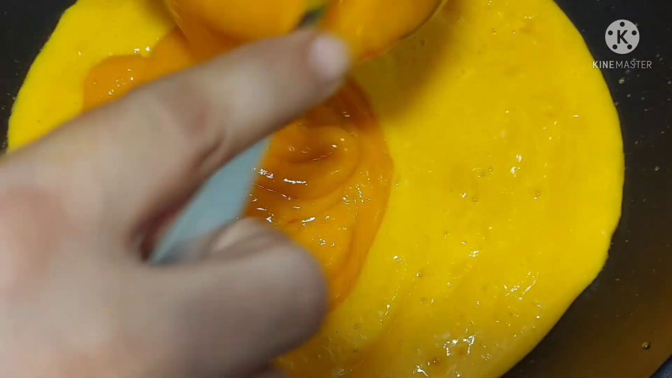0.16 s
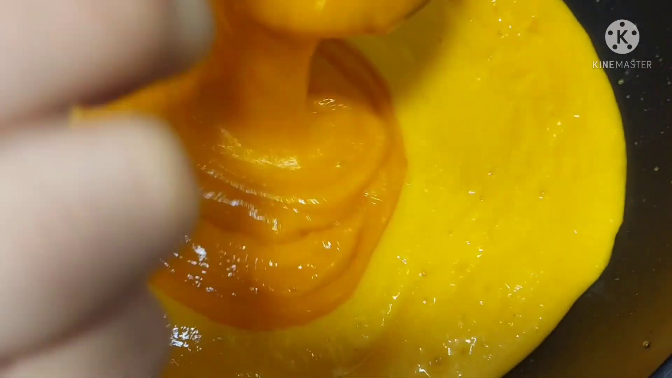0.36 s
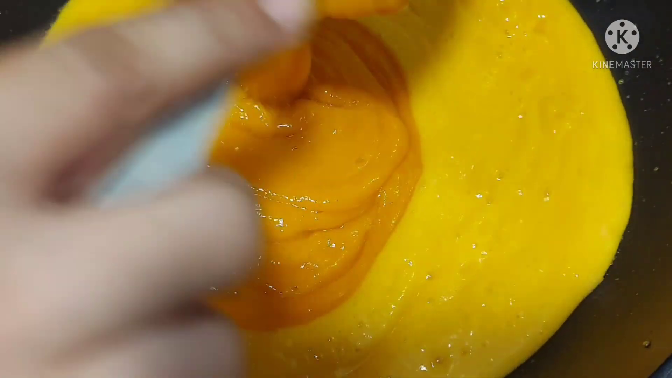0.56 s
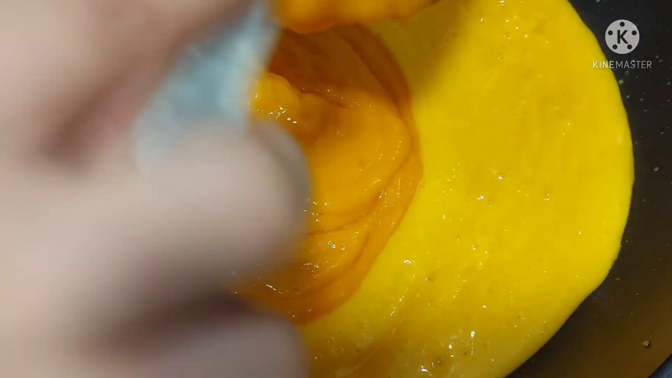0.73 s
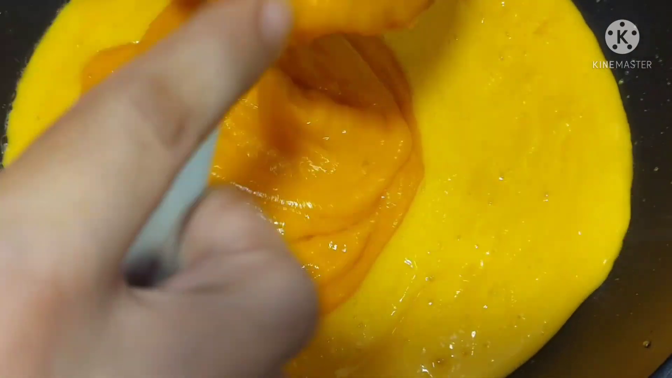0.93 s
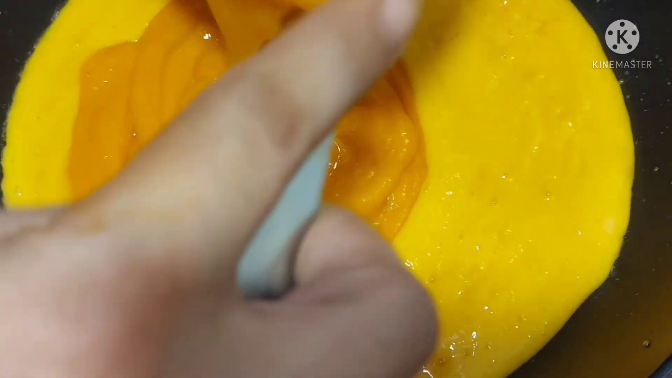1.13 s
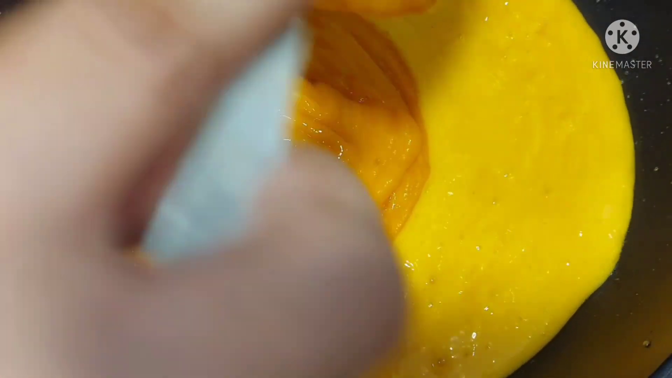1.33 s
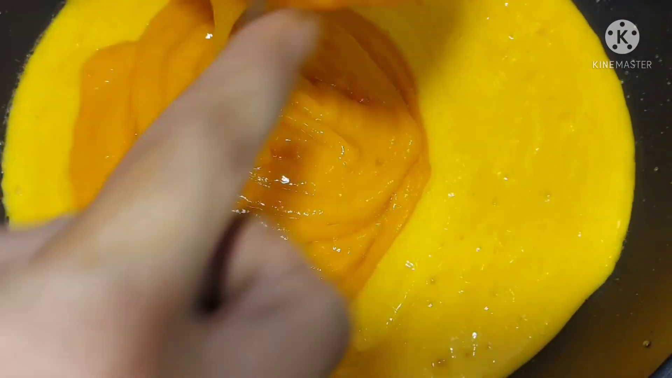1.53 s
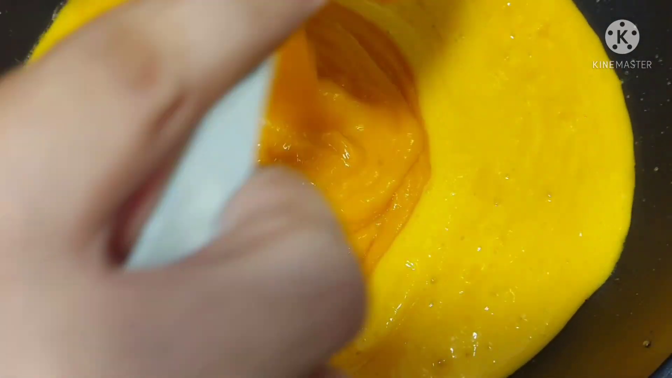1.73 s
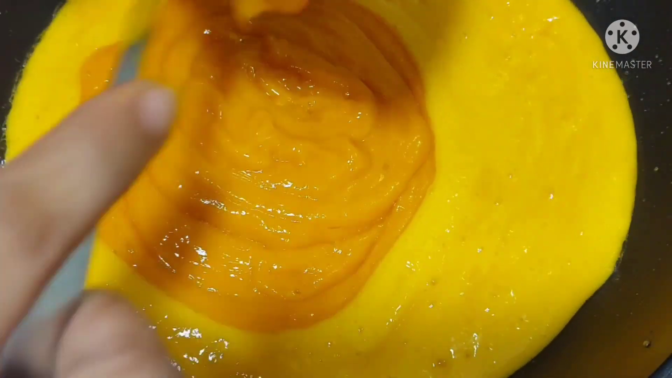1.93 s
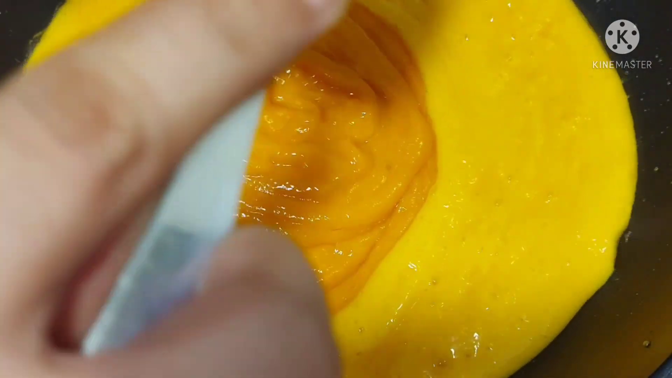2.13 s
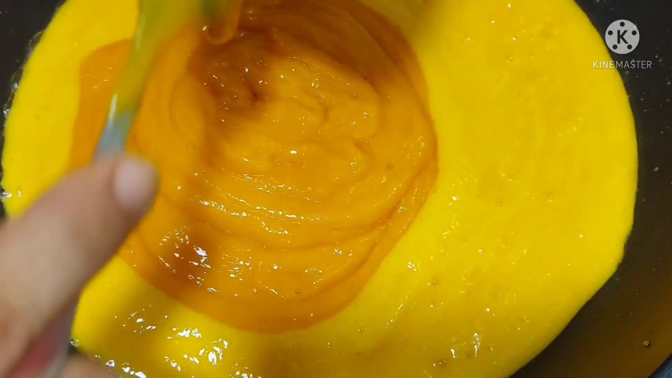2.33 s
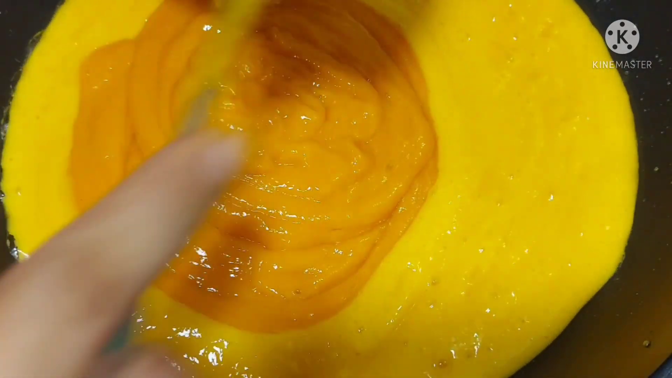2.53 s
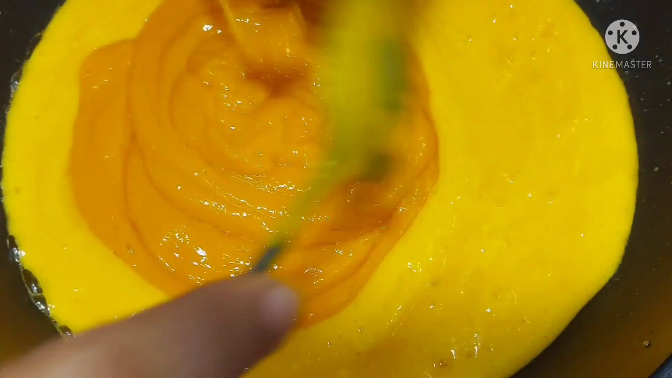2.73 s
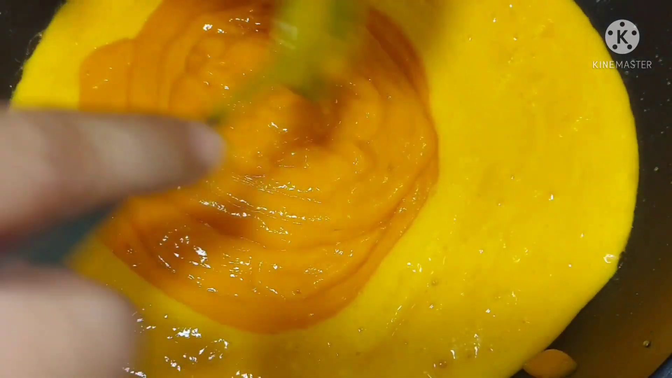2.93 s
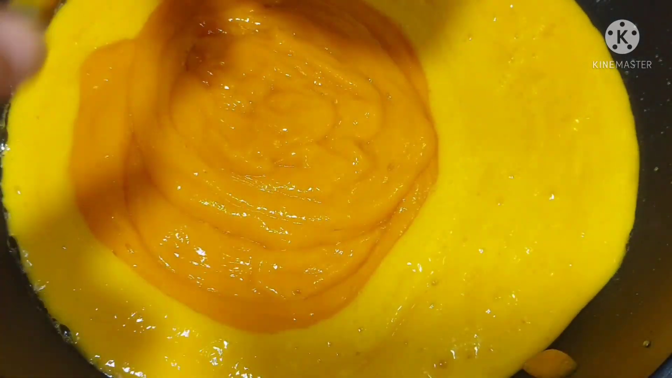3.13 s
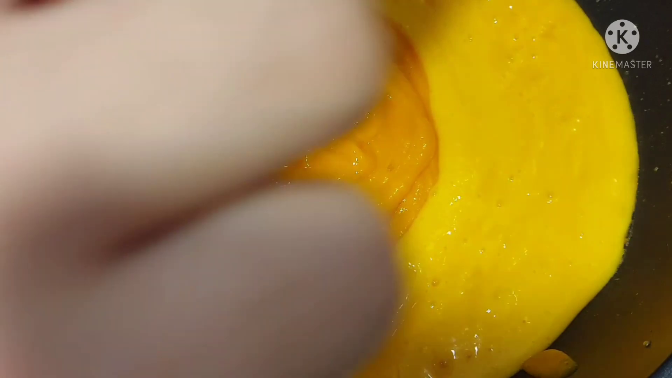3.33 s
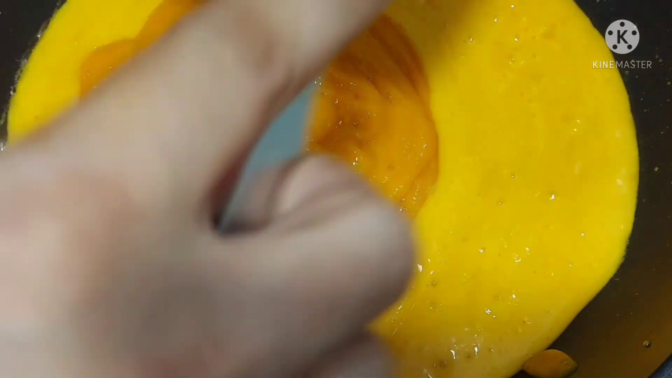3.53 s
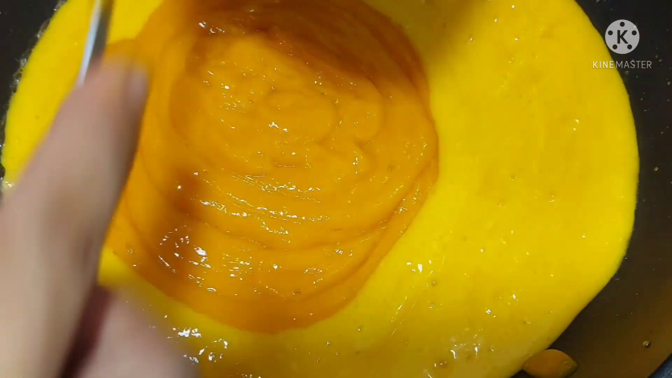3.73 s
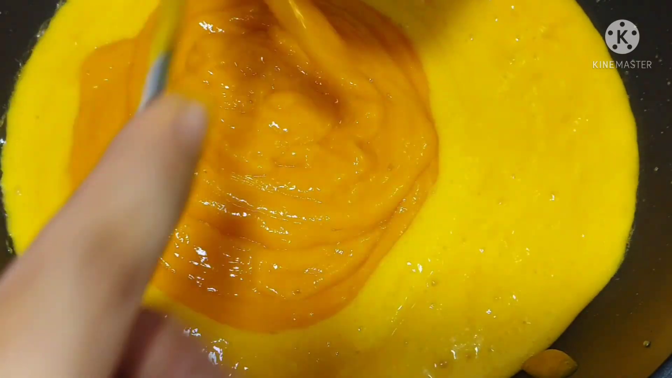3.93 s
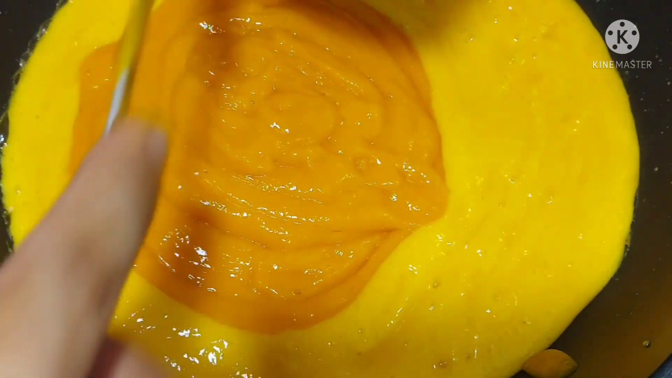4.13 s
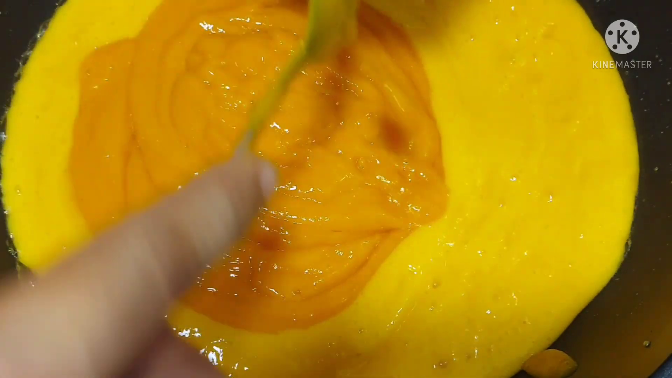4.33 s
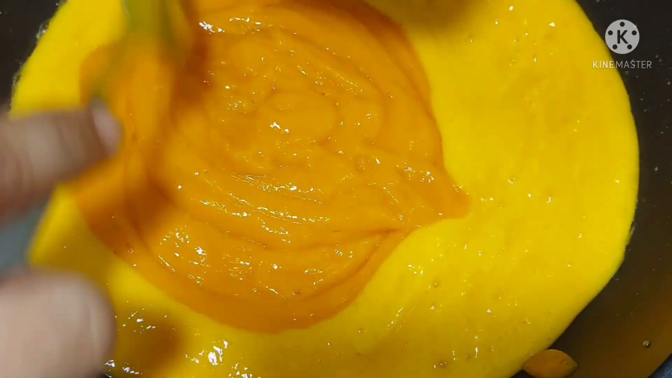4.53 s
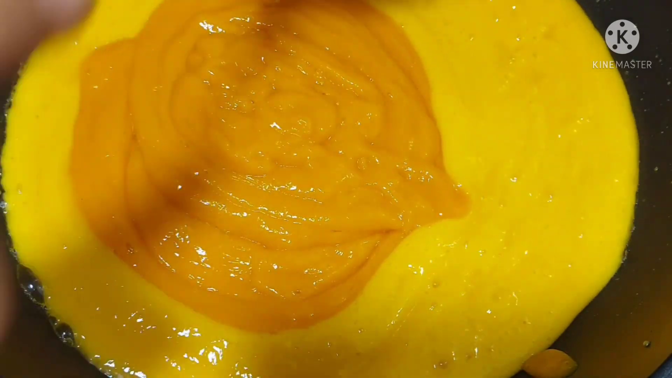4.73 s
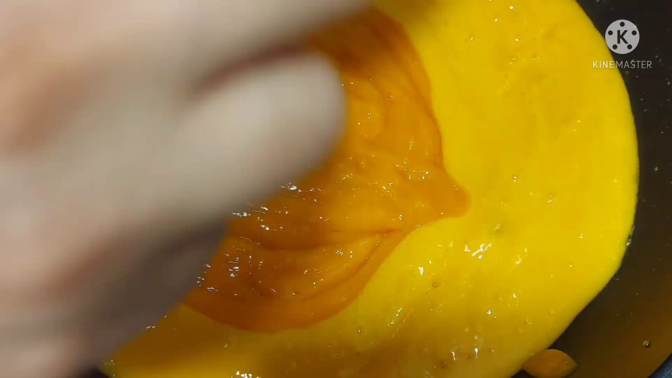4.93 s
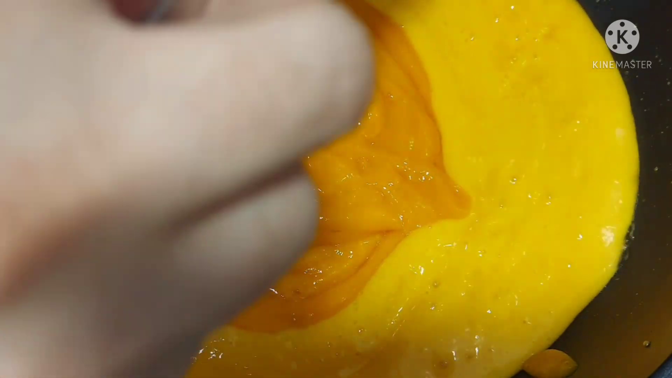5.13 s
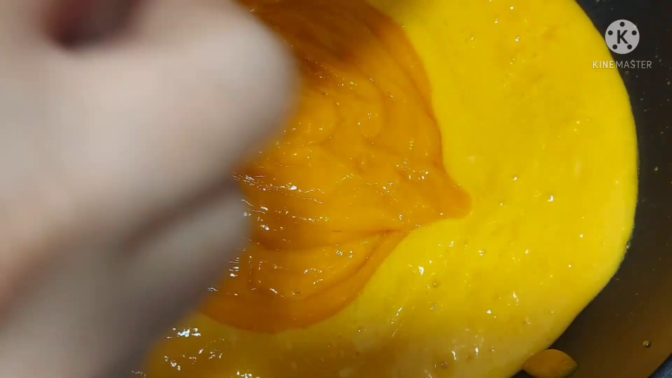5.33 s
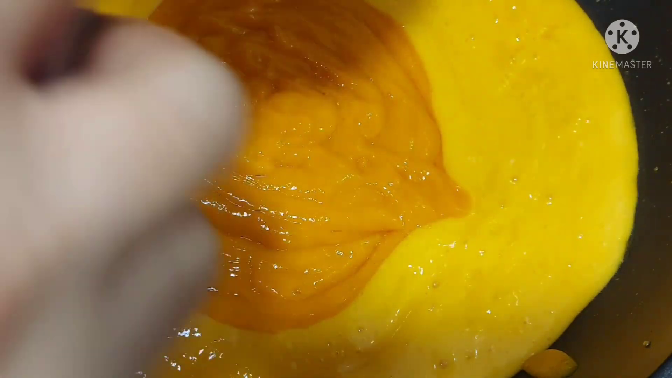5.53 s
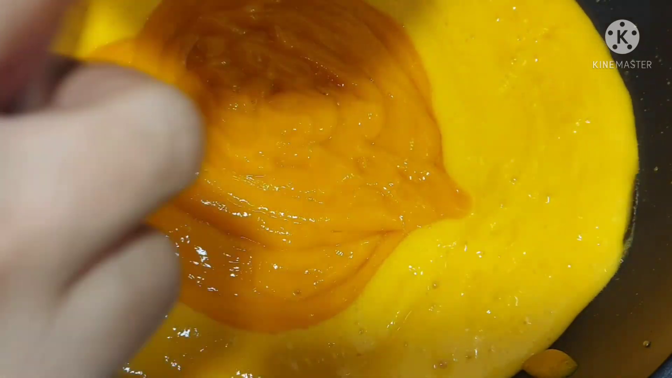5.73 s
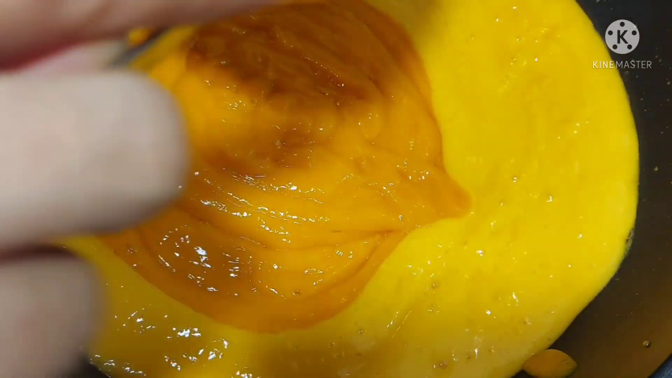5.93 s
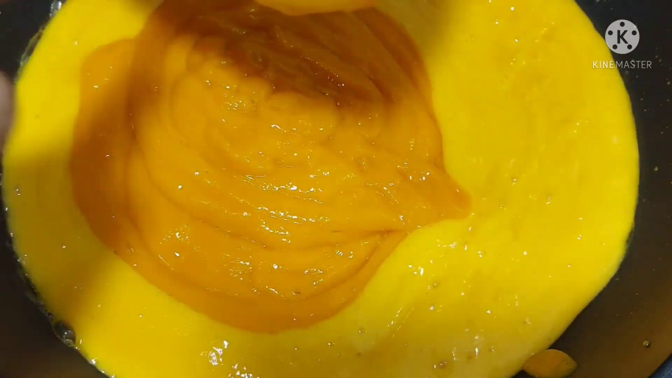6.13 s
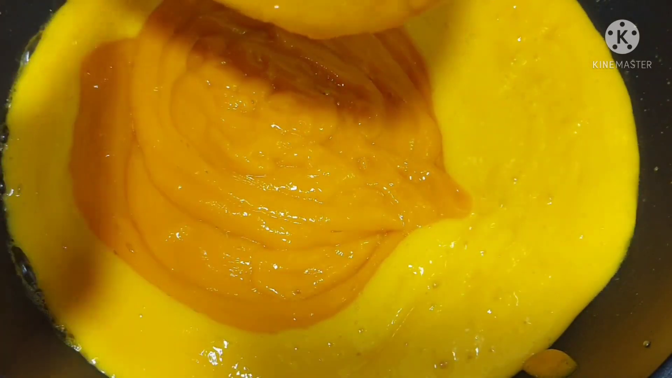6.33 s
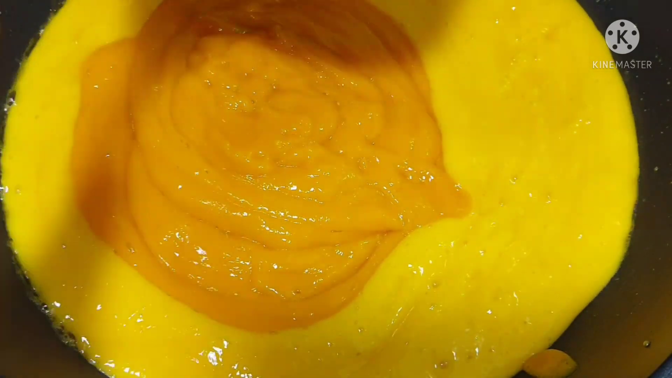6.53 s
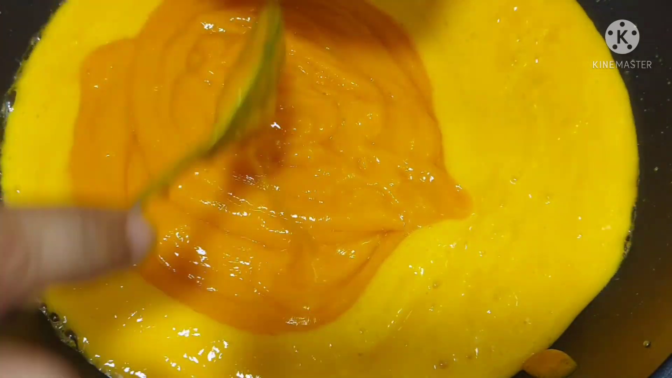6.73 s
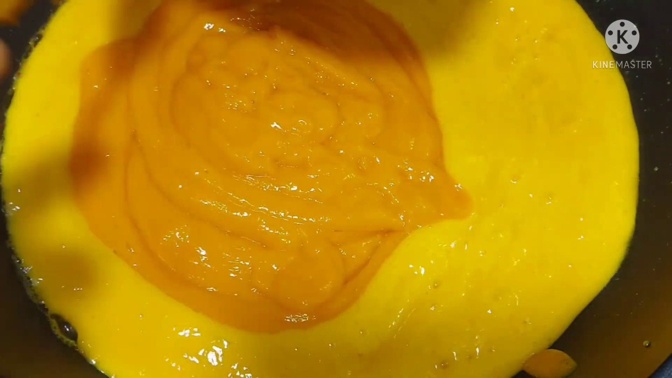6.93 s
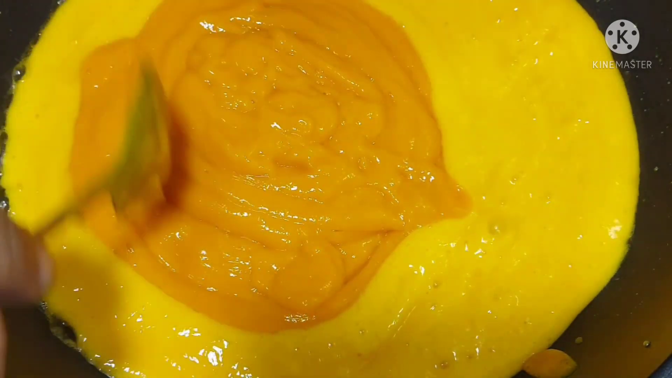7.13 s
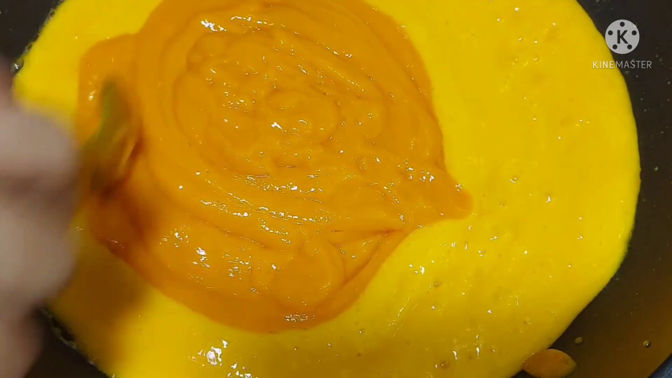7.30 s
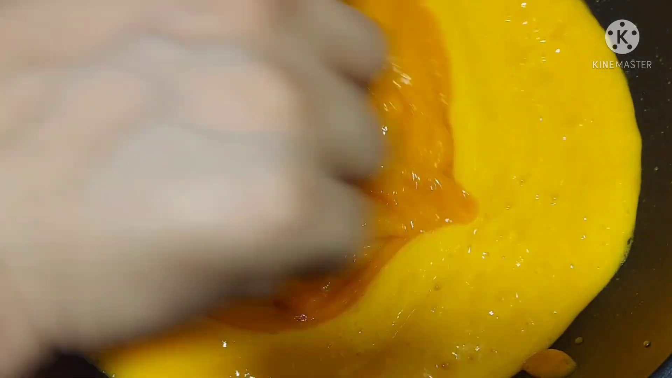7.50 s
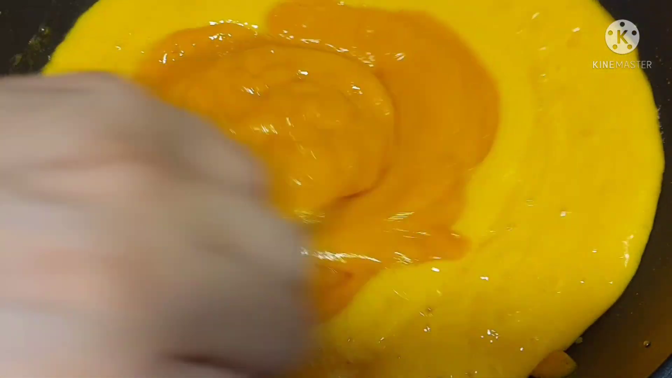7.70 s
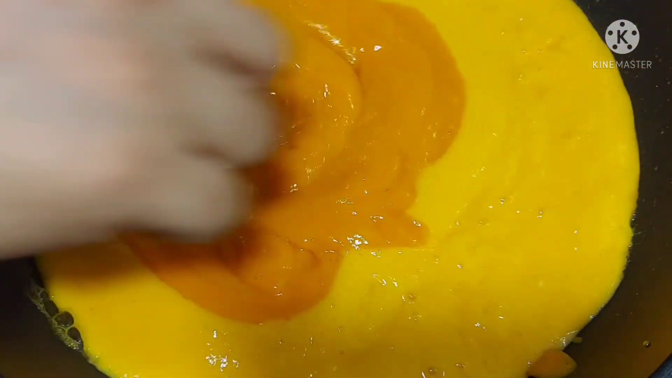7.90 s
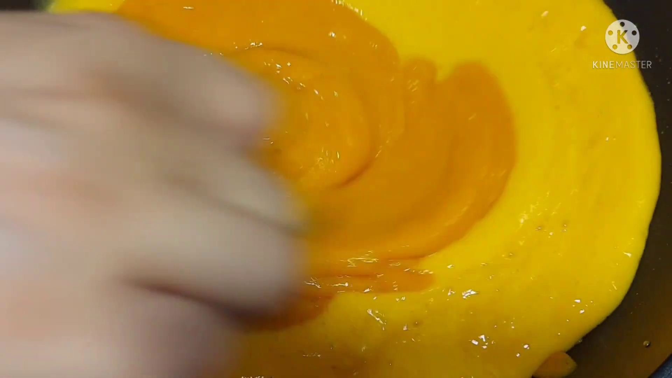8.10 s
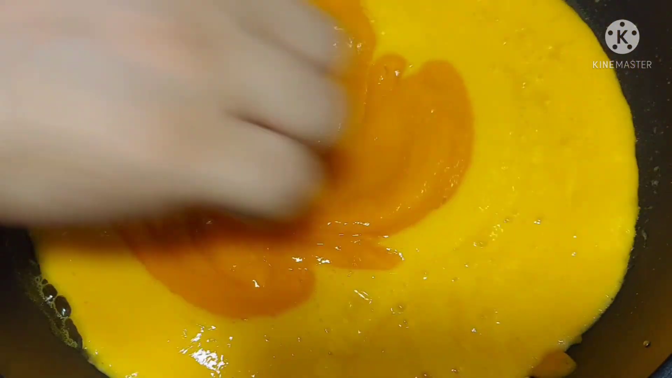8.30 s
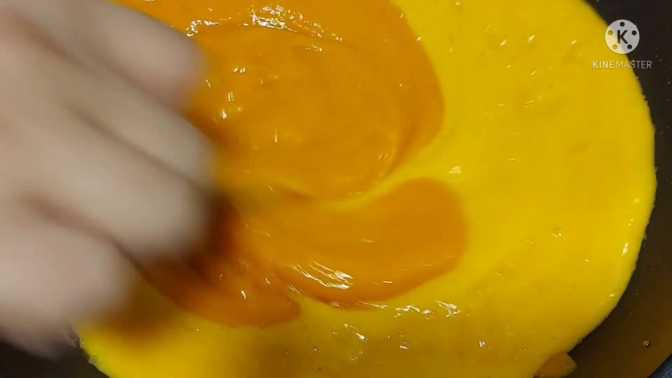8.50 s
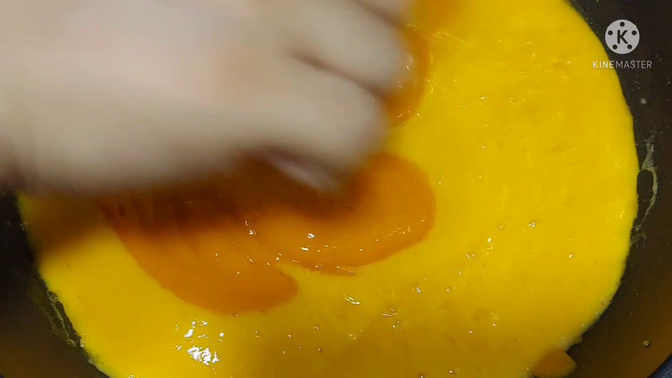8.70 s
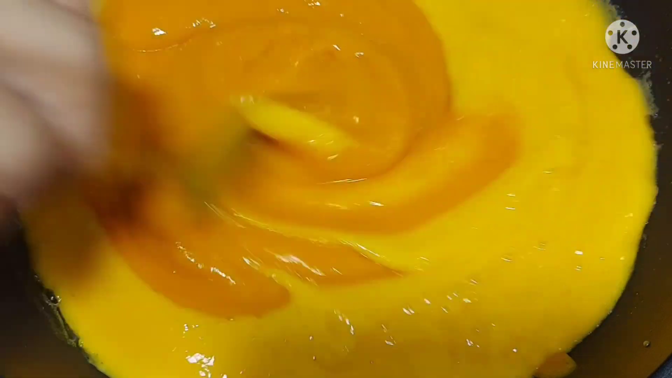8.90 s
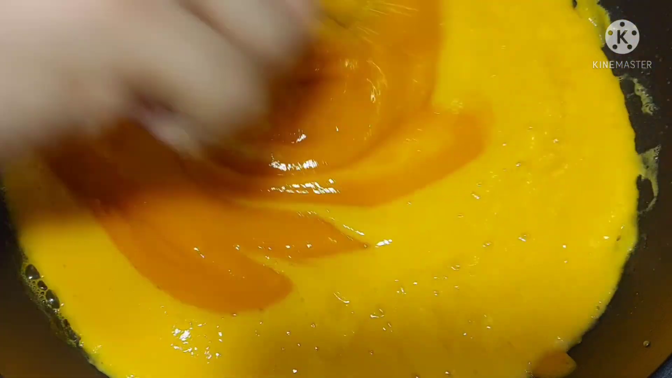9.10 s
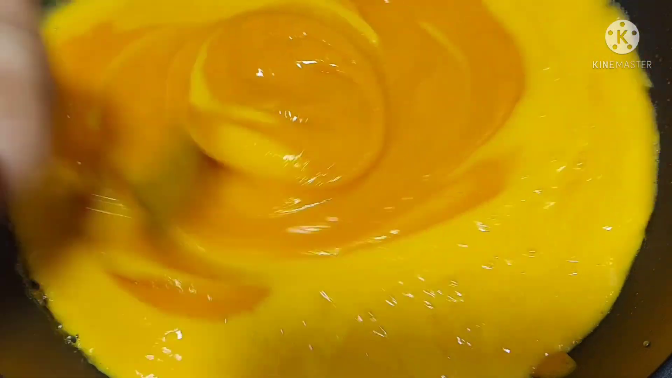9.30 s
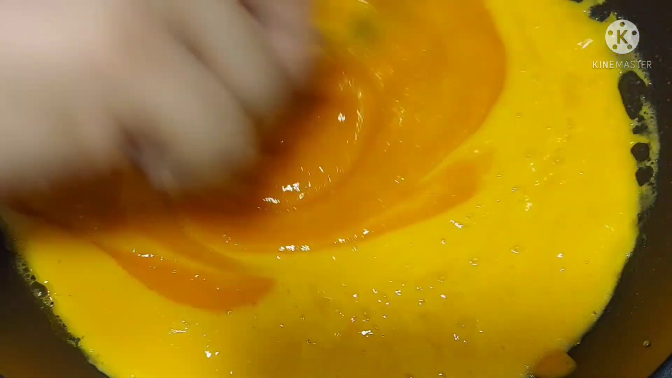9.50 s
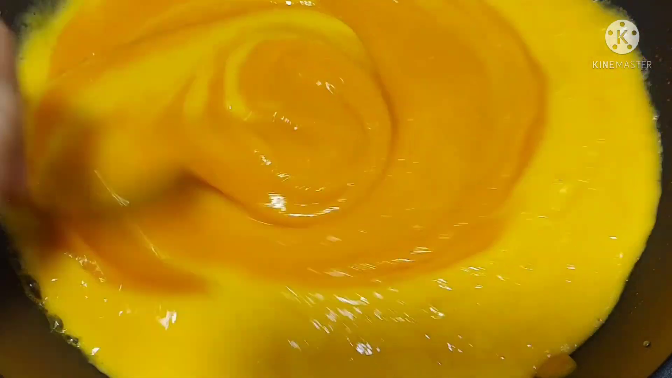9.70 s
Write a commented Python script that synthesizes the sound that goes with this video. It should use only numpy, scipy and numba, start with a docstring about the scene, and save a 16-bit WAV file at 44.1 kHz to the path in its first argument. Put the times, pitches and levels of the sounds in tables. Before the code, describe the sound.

A steel spoon scrapes and clinks thick puree out of a bowl, then stirs it in a faintly sizzling pan.

```python
"""A quiet kitchen rumbles while fruit puree sizzles at its edge in a hot pan. At once a steel spoon begins
to scrape thick puree out of a hand-held bowl: impacts on wall and rim ring the modes of bowl and spoon,
and stick-slip friction rasps and squeaks. The sizzle recedes, and from 2 s on soft plops are heard.
From 7.7 s the spoon knocks and stirs along the pan's bottom, the pan rocks on its stand and the sizzle
grows again."""
import sys
import numpy as np
from scipy import signal
from scipy.fft import rfft, irfft, next_fast_len
from scipy.io import wavfile
from numba import njit

SR = 44100
rng = np.random.default_rng(int(sys.argv[2]) if len(sys.argv) > 2 else 0)


def to_wav(s):
    """Save 16-bit WAV."""
    ch = np.atleast_2d(s).T  # columns
    pcm = np.round(np.clip(ch, -1, 1) * 32767)  # PCM
    wavfile.write(sys.argv[1], SR, pcm.astype(np.int16))


N = 429975

# Impacts of spoon on bowl, levels relative within each column: start_s, crack_db, bowl_low_db,
# bowl_high_db, spoon_low_db, spoon_high_db, ring_share (of the free decay time), chatter_db
KNOCKS = [(.076, -27, -49, -55, -31, -35, .42, -40), (.089, -7, -40, -34, -25.5, -19, .47, -33),
          (.108, 5, -18, -40, -30.5, -19, .2, -22), (.23, .5, -36, -28, -30, -32, .48, -27),
          (.268, -15, -34, -30, -29, -31, .46, -32), (.444, -28, -45, -51, -22, -35, .6, -36),
          (.457, 0, -37, -45, -46, -10, .45, -30), (.487, -15, -39, -41, -20.5, -13, .44, -25),
          (.548, -23, -25, -39, -51, -27, .34, -30), (.563, -4, -35, -21, -25, -6, .2, -22),
          (.585, 4, -43, -35, -24, -18, .43, -24), (.63, -7, -33, -22, -36, -30, .33, -30),
          (.764, 1.5, -18, -40, -32, -5, .21, -26), (.802, 0, -21, -25, -18.5, -4.5, .33, -28),
          (.888, -2, -44, -31, -29, -21, .6, -27), (1.078, -4.5, -51, -39, -22, -5, .36, -16),
          (1.195, -12, -37, -39, -22.5, -14, .71, -21), (1.242, 5, -18, -18, -20, -20, .39, -22),
          (1.402, -3.5, -51, -36, -26.5, -3, .38, -17), (1.479, 0, -20.5, -24, -23, .5, .35, -22),
          (1.862, -13, -51, -46, -24.5, 2, .54, -21), (1.892, -8, -33, -33, -35, -18, .77, -32),
          (1.961, -20, -23, -15, -47, -26, .21, -30), (1.98, 3, -37, -34, -52, -25, .31, -28),
          (2.191, -5, -27.5, -33, -51, -11, .43, -25), (2.345, -12, -33, -18, -32, -35, .37, -28),
          (2.557, -.5, -18, -24, -40, -10, .55, -13.5), (2.973, -16, -5.5, -11, -27, -24, .65, -17),
          (3.426, -5, -26, -18.5, -46, -12, .35, -24), (3.482, -3.5, -28.5, -24.5, -18.5, -.5, .82, -21),
          (3.879, -6, -37, -26.5, -54, -34, .43, -30), (4.12, 5, -11, -9, -25, -21, .85, -12),
          (4.435, -3, -10.5, -13, -40, -24, .78, -19), (4.962, 5.5, -22, -18, -41, -1, .26, -17),
          (4.995, -6, -39, -29, -23.5, -14, .71, -26), (5.062, -3, -34, -30, -19, -8.5, .34, -19.5),
          (5.238, 5, -20.5, -16.5, -45, -12, .38, -20), (5.294, -17, -47, -31, -45, -7, .7, -23),
          (5.478, -9, -41, -34, -33, -8, .6, -17), (5.534, -25, -50, -42, -46, -10, .49, -24),
          (5.697, -2.5, -20.5, -13, -37, -2, .24, -13), (5.724, -2, -45, -38, -22, 0, .36, -22),
          (5.95, -8, -19, -32, -44, -23, .28, -23), (6.008, -11, -30, -29, -30, -16, .33, -26),
          (6.921, -22, -13, -12, -27, -28, .62, -20)]
# Modes of the free bowl, some in close pairs that beat: pitch_hz, level_db, t60_s, family (0 low, 1 high)
BOWL_MODES = [(1444, -1, 0.4, 0), (1470, -2, 0.19, 0), (2250, -12, 0.046, 0), (3650, 8, 0.16, 1),
              (3695, -0.5, 0.41, 1), (4296, -10, .12, 1), (6500, 0, 0.11, 1), (7224, -73, 0.089, 1),
              (9400, -36, .08, 1), (10800, -29, .1, 1)]
# Modes of the spoon, damped by puree: pitch_hz, level_db, t60_s, family (0 low, 1 high)
SPOON_MODES = [(1039, 7, 0.039, 0), (860, -30.5, 0.12, 0), (4910, -13, 0.016, 1), (5280, -7.5, 0.027, 1),
               (6460, -25, 0.033, 1), (8400, -23, 0.045, 1), (8450, -27.5, 0.08, 1),
               (10600, -8.5, 0.019, 1), (12600, -35, .02, 1), (12570, -8.5, 0.018, 1)]


def from_db(db):
    """Amplitude ratio of a level in decibels."""
    return 10 ** (np.asarray(db) / 20)


def rms_one(x):
    """Normalisation to unit rms."""
    return x / np.sqrt(np.mean(x ** 2) + 1e-20)


def white_noise():
    """Gaussian noise with a flat spectrum."""
    return rng.standard_normal(N)


def in_time(rows):
    """Linear interpolation of (time_s, values...) rows, one curve per value."""
    time_s, *columns = np.transpose(rows)
    return [np.interp(np.arange(N) / SR, time_s, column) for column in columns]


def in_frequency(rows):
    """Interpolation of (frequency_hz, value) rows at every FFT bin, on a logarithmic axis."""
    hz, values = np.transpose(rows)
    return np.interp(np.log(np.fft.rfftfreq(N, 1 / SR) + 1), np.log(hz + 1), values)


def coloured(x, spectrum):
    """Filtering by a spectral envelope; unit rms."""
    return rms_one(irfft(rfft(x) * from_db(in_frequency(spectrum)), N))


def drift(rate_hz):
    """Slow random modulation: low-passed noise of unit rms."""
    step, settling = 40, 2000
    r = np.exp(-2 * np.pi * rate_hz * step / SR)
    slow = signal.lfilter([1], [1, -2 * r, r * r], rng.standard_normal(N // step + settling + 2))
    slow = rms_one(slow[settling:])
    return np.interp(np.arange(N) / step, np.arange(len(slow)), slow)


def resonance(x, hz, width_hz):
    """Forced response of a damped oscillator, with unit gain at its peak."""
    r = np.exp(-np.pi * width_hz / SR)
    poles = [1, -2 * r * np.cos(2 * np.pi * hz / SR), r * r]
    return signal.lfilter(np.array([1, 0, -1]) * (1 - r * r) / 2, poles, x)


@njit
def moving_resonance(x, hz, width_hz):
    """Forced response of a damped oscillator whose natural frequency varies."""
    r = np.exp(-np.pi * width_hz / SR)
    y = np.zeros(len(x))
    for i in range(2, len(x)):
        drive = (1 - r * r) / 2 * (x[i] - x[i - 2])
        y[i] = drive + 2 * r * np.cos(2 * np.pi * hz[i] / SR) * y[i - 1] - r * r * y[i - 2]
    return y


def grains(per_s, spread_db):
    """Shot noise: randomly timed impulses of uneven size; unit rms."""
    sizes = from_db(spread_db * np.minimum(rng.exponential(1, N), 5)) * rng.choice([-1, 1], N)
    return rms_one(sizes * (rng.random(N) < per_s / SR)) + 1e-9


def swells(onset_s, rise_s, hold_s, fall_s, levels_db):
    """Exponential envelopes, one per list of levels; where events overlap the loudest prevails."""
    climb_db, drop_db = 12.5, 20  # over rise_s before the onset, and per fall_s after the hold
    t, out = np.arange(N) / SR, np.zeros((len(levels_db), N))
    gains = from_db(levels_db)
    for k, (onset, rise, hold, fall) in enumerate(np.broadcast(onset_s, rise_s, hold_s, fall_s)):
        span = slice(max(round((onset - rise) * SR), 0), round((onset + hold + 3 * fall) * SR))
        age_s = t[span] - onset
        shape_db = climb_db * np.minimum(age_s, 0) / max(rise, 1e-3)
        shape_db -= drop_db * np.maximum(age_s - hold, 0) / max(fall, 1e-3)
        out[:, span] = np.maximum(out[:, span], gains[:, k, None] * from_db(shape_db))
    return out


def two_sided(make, correlation=.44):
    """Partial coherence: a broad source arrives left and right partly alike, partly unrelated."""
    mid, side = make(), make()
    return np.sqrt((1 + correlation) / 2) * mid + np.sqrt((1 - correlation) / 2) * side * [[1], [-1]]


def diffuse(pair, spectrum):
    """A diffuse field: two independent noises mix to a coherence that depends on frequency."""
    # Likeness of left and right: frequency_hz, correlation
    coherence = [(60, 0.95), (180, 1), (550, 0.59), (1650, -0.041), (4970, -0.2), (15000, 0.36)]
    alike = in_frequency(coherence)
    mid, side = rfft(pair)
    mixed = np.sqrt(1 + alike) * mid + np.sqrt(1 - alike) * side * [[1], [-1]]
    return coloured(irfft(mixed, N), spectrum)


def placed(x, balance, lag_s):
    """Localisation by level and time differences: the right side hears a near source later."""
    hz = np.fft.rfftfreq(N, 1 / SR) + 1
    half = from_db(in_frequency(balance) / 2) * np.exp(1j * np.pi * hz * lag_s)
    return irfft(rfft(x) * np.array([half, 1 / half]), N)


def room_tone():
    """Modulated broadband noise rumbles, narrowband noise hums, and a low tone swells twice."""
    # Spectral density of the rumble: frequency_hz, level_db
    spectrum = [(15, -54), (25, -38), (54, -12.5), (112, 1), (151, -0.5), (188, 4), (259, -6), (414, -7.5),
                (457, -25), (543, -11), (678, -15.5), (730, -11), (1350, -11.5), (2380, -16.5), (9000, -24),
                (11700, -67), (19800, -120)]
    # Course of the rumble and the deepest hum: time_s, rumble_db, deep_db
    levels = [(0, -32, -46), (1.0, -35.5, -48), (1.7, -38.5, -49), (2.05, -37.5, -42), (2.66, -37.5, -40),
              (3.3, -42, -52), (3.6, -39.5, -44), (4.3, -42.5, -53), (4.7, -41.5, -47), (5.4, -41, -50),
              (5.7, -42, -42), (6.4, -41.5, -45), (6.7, -44, -58), (7.0, -42, -44), (7.7, -41, -53),
              (8.45, -42.5, -52), (8.7, -38, -38), (9.75, -40, -54)]
    # Steady hums: pitch_hz, width_hz, level_db
    drones = [(187, 12, -51.5), (288.2, 6.7, -54.5), (5570, 180, -60)]
    # Swells of the low tone: onset_s, rise_s, hold_s, fall_s, level_db, pitch_hz
    tone_swells = [(2.38, .22, .25, .03, -41, 128.5), (4.81, .04, .25, .18, -38, 128.5)]
    sag_hz_per_s = 9
    rumble_db, deep_db = in_time(levels)
    out = from_db(rumble_db + 1.5 * drift(19)) * diffuse(rng.standard_normal((2, N)), spectrum)
    out += from_db(deep_db) * rms_one(resonance(white_noise(), hz=60.8, width_hz=8.1))
    for hz, width_hz, level_db in drones:
        out += from_db(level_db) * rms_one(resonance(white_noise(), hz, width_hz))
    for onset_s, rise_s, hold_s, fall_s, level_db, hz in tone_swells:
        t = np.arange(N) / SR - onset_s - hold_s / 2
        tone = np.sqrt(2) * np.sin(2 * np.pi * (hz - sag_hz_per_s * t / 2) * t)
        out += swells([onset_s], rise_s, hold_s, fall_s, [[level_db]]) * tone
    return out


def sizzle():
    """Fine bubbles burst all round the puree's hot edge and add up to shot noise."""
    # Course of the sizzle: time_s, level_db
    levels = [(0, -32), (.78, -32), (1.8, -40), (2.9, -41.5), (3.3, -44.5), (4.8, -47), (6.7, -50),
              (7.3, -48), (7.6, -44.5), (7.7, -34.5), (7.85, -31), (8.15, -37.5), (8.45, -34.5), (8.8, -36),
              (9.3, -34), (9.5, -32), (9.75, -32.5)]
    # Spectral density of the bursts: frequency_hz, level_db
    spectrum = [(1180, -28), (2000, -22), (2300, -2), (2500, -12.5), (2780, -1.5), (3000, -2.5), (5130, 1),
                (7580, -2.5), (10100, 4), (14900, 2), (15800, -49.5)]
    bursts = np.array([grains(per_s=12000, spread_db=1.5) for side in range(2)])
    flutter = from_db(.8 * drift(12))
    return from_db(in_time(levels)[0]) * flutter * diffuse(bursts, spectrum)


def knocks():
    """Each impact cracks and sets bowl and spoon in free vibration; fingers and puree damp the bowl."""
    # Spectral density of the contact noise: frequency_hz, level_db
    crack_spectrum = [(300, -34), (700, -24.5), (1500, -4), (3000, 2.5), (5000, 0.5), (9000, -3),
                      (15000, -4.5)]
    ringing, cracks, t = np.zeros((2, N + SR)), np.zeros(N + SR), np.arange(SR // 3) / SR
    bowl, spoon = np.array(BOWL_MODES), np.array(SPOON_MODES)
    mode_hz, mode_db, _, _ = np.r_[bowl, spoon].T
    family = np.r_[bowl[:, 3], 2 + spoon[:, 3]].astype(int)  # index into a knock's four modal levels
    # grip and load detune the spoon from blow to blow, the bowl hardly
    detune = np.r_[np.full(len(bowl), .002), np.full(len(spoon), .05)]
    for start_s, crack_db, *family_db, ring_share, _ in KNOCKS:
        level_scatter, pitch_scatter, phase_scatter, polarity = rng.normal(0, 1, (len(mode_hz), 4)).T
        level_db = mode_db + np.array(family_db)[family] + 1.5 * level_scatter
        hz = mode_hz * (1 + detune * pitch_scatter)
        t60_s = np.r_[bowl[:, 2] * ring_share, spoon[:, 2]]
        modes = from_db(-60 * t / t60_s[:, None]) * np.exp(2j * np.pi * hz[:, None] * t)
        # the tilted bowl radiates each mode left and right with its own phase, more so in the treble
        turn = np.exp(.5j * phase_scatter * np.minimum(hz / 3000, 1.3))
        gains = np.sign(polarity) * from_db(level_db) * np.array([turn, 1 / turn])
        ringing[:, round(start_s * SR):][:, :len(t)] += (gains @ modes).imag
        snap = from_db(crack_db - 11 - 60 * t / .021)
        rattle = from_db(crack_db - 26 - 60 * t / (.22 * ring_share))
        cracks[round(start_s * SR):][:len(t)] += snap + rattle
    return ringing[:, :N] + cracks[:N] * coloured(two_sided(white_noise), crack_spectrum)


def bowl_contact():
    """Friction follows each rub and the chatter after each knock: five gains and two squeak pitches."""
    # Rubs along the bowl, squeak levels relative to the rasp: onset_s, rise_s, fall_s, rasp_db,
    # spoon_drag_db, bowl_hum_db, low_squeak_hz, low_squeak_db, mid_squeak_hz, mid_squeak_db
    rubs = [(.15, .04, .2, -28.5, -38, -31, 1530, 0, 4190, -4),
            (.225, .07, .13, -26.5, -30, -32, 2260, -8, 3640, 1),
            (.295, .05, .09, -33.5, -35, -43, 1940, -2, 3660, -9),
            (.485, .04, .04, -22.5, -30.5, -41, 2500, -4, 4500, -8),
            (.563, .04, .13, -19, -26.5, -22.5, 1620, -14, 3870, -6),
            (.861, .06, .14, -24, -40, -35, 1650, -8, 4420, -6),
            (.947, .08, .11, -31.5, -38, -46, 2090, -4, 3720, -8),
            (1.205, .03, .13, -24, -32, -48, 1800, -11, 5100, 0),
            (1.255, .04, .033, -18, -23, -36, 1880, -17, 3760, -6),
            (1.513, .03, .12, -25.5, -36, -31, 1890, -9, 5000, -10),
            (1.64, .05, .06, -30, -37.5, -47, 2460, -3, 3650, -1.5),
            (1.903, .03, .15, -33, -35, -29, 1700, -15, 3900, -8),
            (1.965, .07, .09, -29.5, -45, -33, 2280, -4, 3600, 5),
            (2.33, .1, .055, -25, -33, -33, 1600, -5, 3780, 3),
            (2.645, .05, .1, -25, -29, -33, 1840, -6.5, 3700, -2),
            (2.69, .05, .045, -25.5, -46, -37, 2120, -10, 3700, -1),
            (3.07, .08, .085, -29.5, -31, -40, 1560, -29, 3770, -19),
            (3.25, .05, .04, -47, -43, -54, 1840, -8, 4420, -8),
            (3.56, .06, .4, -30, -32, -35, 1800, -8, 3900, -4),
            (3.72, .1, .07, -32, -37, -43, 2300, 5, 3300, 2),
            (3.83, .09, .09, -35, -50, -48, 2230, 0, 3700, 1),
            (3.884, .02, .04, -30, -41, -37, 2140, -3, 3800, -3),
            (4.205, .07, .075, -27, -31, -24, 1900, -4, 3650, -1),
            (4.476, .03, .2, -33.5, -36, -25, 1550, -7, 3620, -3),
            (5.004, .03, .12, -25, -31, -47, 2340, -18, 3790, -10),
            (5.09, .03, .07, -29, -30, -36, 1800, -9, 3800, -4),
            (5.32, .05, .055, -19, -45, -45, 1760, -19, 4300, -7),
            (5.555, .05, .048, -18, -38, -47, 1880, -20, 5260, -5),
            (5.755, .03, .08, -21, -43, -45, 2130, -30, 5200, -4),
            (5.8, .05, .038, -24.5, -33.5, -39, 1800, -12, 5440, -6),
            (6.085, .06, .13, -28, -39, -42, 2000, -18, 3900, -2),
            (6.215, .05, .08, -29, -43, -43, 2200, -6, 4100, -1),
            (6.291, .07, .2, -33, -42, -40, 2230, -4, 4140, -2),
            (6.46, .1, .045, -34, -43, -44, 1930, -14, 3600, -2),
            (6.946, .015, .2, -36, -33, -33, 1530, -15, 3630, 0)]
    onset_s, rise_s, fall_s, rasp_db, drag_db, hum_db, low_hz, low_db, mid_hz, mid_db = np.transpose(rubs)
    rub_levels = [drag_db, hum_db, rasp_db, rasp_db + low_db, rasp_db + mid_db]
    rubbing = swells(onset_s, rise_s, .2 * rise_s, fall_s, rub_levels)
    knock_s, _, bowl_db, _, spoon_db, _, _, chatter_db = np.transpose(KNOCKS)
    chatter_levels = [spoon_db - 7, bowl_db - 9, chatter_db, chatter_db - 11, chatter_db - 3]
    chatter = swells(knock_s, rise_s=0, hold_s=0, fall_s=.037, levels_db=chatter_levels)
    return np.maximum(rubbing, chatter), in_time(np.transpose([onset_s, low_hz, mid_hz]))


def bowl_scrape():
    """Stick-slip friction of the spoon's edge on the glaze drives damped modes and three squeaks."""
    # Spectral density of the rasp: frequency_hz, level_db
    rasp_spectrum = [(880, 1), (1500, -52), (2240, -38), (2520, 5.5), (3760, 6), (4350, 11), (5400, 1.5),
                     (7090, 3.5), (8790, 2.5), (13800, 5), (15500, -21)]
    (drag_gain, hum_gain, rasp_gain, low_gain, mid_gain), (low_hz, mid_hz) = bowl_contact()
    slips = two_sided(lambda: grains(per_s=6000, spread_db=3)) * from_db(2.5 * drift(40))

    def ringing(modes, family):
        """Contact damping widens every mode, and each comes and goes as the contact point moves."""
        flickers_db = [4 * drift(9) for mode in modes]
        return rms_one(sum(from_db(db + flicker_db) * rms_one(resonance(slips, hz, 8.4 / t60_s))
                           for (hz, db, t60_s, member), flicker_db in zip(modes, flickers_db)
                           if member == family))

    def squeak(hz, width_hz):
        """Two resonators in cascade make a steep peak that wavers about a gliding pitch."""
        hz = hz * (1 + .03 * drift(25))
        once = [moving_resonance(side, hz, width_hz) for side in slips]
        return rms_one(np.array([moving_resonance(side, hz, width_hz) for side in once]))

    rasp = from_db(-12) * ringing(BOWL_MODES, family=1)
    rasp += from_db(-2.5) * ringing(SPOON_MODES, family=1)
    rasp += from_db(-5.5) * coloured(slips, rasp_spectrum)
    rasp += from_db(-12) * squeak(hz=9400 * (1 + .05 * drift(4)), width_hz=2000)
    squeaks = low_gain * squeak(low_hz, width_hz=520) + mid_gain * squeak(mid_hz, width_hz=400)
    drag = drag_gain * ringing(SPOON_MODES, family=0)
    hum = hum_gain * ringing(BOWL_MODES, family=0)
    return drag + hum + rasp_gain * rasp + squeaks


def plops():
    """Soft impacts of puree and fingers: each is a puff of noise in one heavily damped resonance."""
    # Soft impacts: start_s, relative_level_db, centre_hz
    impacts = [(2.108, -22, 807), (2.504, -25, 345), (3.253, -25, 288), (4.589, -35, 1460),
               (4.634, -30, 1460), (6.074, -30, 288), (6.49, -23, 339), (6.675, -27, 810),
               (6.898, -25.5, 1470), (7.058, -26, 799), (7.147, -27.5, 395), (7.237, -26.5, 543),
               (7.299, -35, 339), (7.46, -26, 541)]
    attack_s, t60_s = .0033, .07
    out, t = np.zeros(N), np.arange(SR // 10) / SR
    envelope = (1 - np.exp(-t / attack_s)) * from_db(-60 * t / t60_s)
    for start_s, level_db, hz in impacts:
        puff = rms_one(resonance(rng.standard_normal(len(t)), hz, width_hz=.6 * hz))
        out[round(start_s * SR):][:len(t)] += from_db(level_db - 6) * envelope * puff
    return out


def stirring():
    """Friction and impacts force the puree-damped pan; returns the scraping and the pan's low sounds."""
    # Strokes on the pan's bottom: onset_s, rise_s, hold_s, fall_s, level_db
    strokes = [(7.72, .05, .45, .1, -51), (8.38, .05, 1.4, .1, -44), (7.759, .002, .06, .14, -29),
               (7.923, .06, .01, .045, -35), (8.21, .002, .12, .05, -23), (8.493, .002, .003, .025, -28),
               (8.575, .008, .135, .048, -24), (8.84, .002, .003, .03, -21), (8.978, .002, .065, .14, -23),
               (9.175, .07, .05, .03, -24.5), (9.33, .002, .06, .1, -25.5), (9.565, .06, .04, .05, -25),
               (9.745, .06, .01, .05, -26.5)]
    # Impacts of spoon on pan, levels relative within each column: start_s, hit_db, thud_db, ring_db
    hits = [(7.759, -21, -40, -47), (8.210, -4, -35, -45), (8.493, -26, -39, -50), (8.567, -13, -37, -44),
            (8.629, -20, -23, -48), (8.840, -10, -32, -50), (8.957, -30, -27, -42), (8.978, 0, -29, -38),
            (9.330, -7, -35, -37)]
    # Broad modes of the pan: pitch_hz, width_hz, level_db
    pan_modes = [(720, 60, -4), (810, 80, 1.5), (930, 70, -4), (1135, 70, -6), (1460, 80, -10),
                 (1980, 120, -11)]
    # Spectral density of the friction noise: frequency_hz, level_db
    friction_spectrum = [(240, -32), (400, -13), (640, -13.5), (810, -3.5), (1000, -4), (1600, -11),
                         (2600, -14), (3900, -14), (5000, -13.5), (9000, -17.5), (15500, -25)]
    *timing, stroke_db = np.transpose(strokes)
    stroke_gain, = swells(*timing, [stroke_db])
    slips = two_sided(lambda: grains(per_s=7000, spread_db=2.5)) * from_db(2 * drift(30))
    slaps, ticks, thuds, strikes = np.zeros((4, N))
    t, slap_t60_s = np.arange(SR // 4) / SR, .045
    for start_s, hit_db, thud_db, ring_db in hits:
        start = round(start_s * SR)
        slaps[start:][:len(t)] += from_db(hit_db - 60 * t / slap_t60_s)
        ticks[start] += from_db(hit_db + 26)
        thuds[start] += from_db(thud_db + 30)
        strikes[start] += from_db(ring_db)
    force = stroke_gain * from_db(14.5) * slips + ticks
    modes = sum(resonance(force, hz, width_hz) * from_db(db) * np.sqrt(80 / width_hz)
                for hz, width_hz, db in pan_modes)
    friction = from_db(-3) * stroke_gain * coloured(slips, friction_spectrum)
    low_sounds = pan_ring(strikes) + pan_rocking(thuds)
    # the wet slap of each touch: a dying puff in the pan's broad middle range
    puff = two_sided(white_noise)
    middle = rms_one(resonance(resonance(puff, hz=950, width_hz=700), hz=950, width_hz=700))
    smack = slaps * (from_db(-8) * middle + from_db(-20) * puff)
    return modes + friction + smack, low_sounds


def pan_ring(strikes, hz=428, t60_s=1.8):
    """Free decay: one lightly damped mode of the pan rings on after each strike."""
    r, angle = from_db(-60 / (t60_s * SR)), 2 * np.pi * hz / SR
    return signal.lfilter([0, np.sin(angle)], [1, -2 * r * np.cos(angle), r * r], strikes + 1e-18)


def pan_rocking(thuds):
    """Forced vibration: thuds and lurches drive the low resonances of the pan on its stand."""
    # Lurches of the pan: onset_s, rise_s, hold_s, fall_s, rocking_db, hum_db
    lurches = [(7.85, .1, .05, .1, -43, -46), (8.272, .06, .01, .15, -49, -31),
               (8.637, .04, .03, .15, -29, -27), (8.755, .04, .08, .1, -32, -31),
               (8.965, .03, .005, .04, -32, -27), (9.03, .05, .06, .15, -41, -38),
               (9.38, .06, .1, .2, -45, -38)]
    # Modes of the rocking pan: pitch_hz, width_hz, level_db
    rocking_modes = [(64, 10, -15.5), (120, 26, 5), (167.6, 86, -0.5), (263, 70, 5), (445, 56, -19)]
    *timing, rocking_db, hum_db = np.transpose(lurches)
    rocking_gain, hum_gain = swells(*timing, [rocking_db, hum_db])
    force = thuds + rocking_gain * from_db(14.5) * white_noise()
    rocking = sum(from_db(db) * resonance(force, hz, width_hz) for hz, width_hz, db in rocking_modes)
    return rocking + hum_gain * rms_one(resonance(white_noise(), hz=184, width_hz=15))


def kitchen_reverberation(x, t60_s=.2, wall_cutoff_hz=13700):
    """Repeated reflection: eight echo loops a side, each round weaker and duller by wall absorption."""
    size = next_fast_len(N + SR)
    hz = np.fft.rfftfreq(size, 1 / SR)
    wall_gain = 1 / np.sqrt(1 + (hz / wall_cutoff_hz) ** 2)
    delays_s = np.floor(rng.uniform(.006, .03, 16) * SR) / SR
    response = np.zeros((2, len(hz)), complex)
    for k, delay_s in enumerate(delays_s):
        loop = from_db(-60 * delay_s / t60_s) * wall_gain * np.exp(-2j * np.pi * hz * delay_s)
        response[k % 2] += loop / (1 - loop) * (-1) ** (k // 2)
    return irfft(response * rfft(x, size), size)[:, :N]


def scene():
    """Superposition of direct sound from bowl and pan, its reverberation, the sizzle and the room."""
    # Stereo balance of the bowl: frequency_hz, left_minus_right_db
    bowl_balance = [(500, -0.5), (1000, 8), (1460, -4.5), (2200, 4.5), (3700, 3), (5500, 0), (9000, 2),
                    (15000, -0.8)]
    # Stereo balance of the pan: frequency_hz, left_minus_right_db
    pan_balance = [(500, -1), (1000, 4), (2000, -2), (5000, -0.3), (15000, -3)]
    bowl = knocks() + bowl_scrape() + plops()
    pan, pan_lows = stirring()
    direct = placed(bowl, bowl_balance, lag_s=.00012) + placed(pan, pan_balance, lag_s=.00013) + pan_lows
    reverberation = from_db(-12.5) * kitchen_reverberation((bowl + pan).mean(axis=0))
    return direct + reverberation + sizzle() + room_tone()


def record(dry):
    """Band limiting and clipping: deep bass rolls off, the hardest knocks overload, the top is cut."""
    low_cut = signal.butter(2, 45, "high", fs=SR, output="sos")
    high_cut = signal.cheby2(16, 80, 16200, fs=SR, output="sos")
    clipped = np.clip(signal.sosfilt(low_cut, dry), -1, 1)
    return signal.sosfilt(high_cut, clipped)


dry = scene()
out = record(dry)
to_wav(out)
```